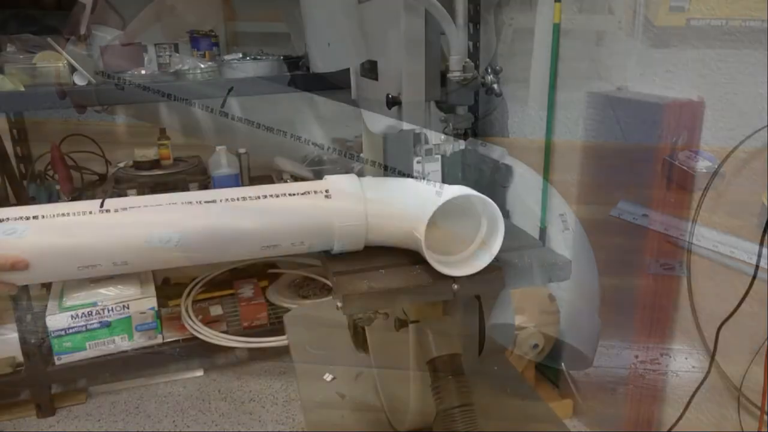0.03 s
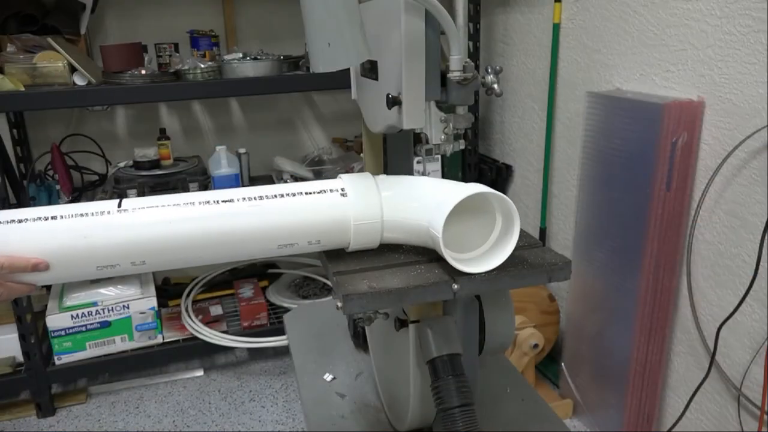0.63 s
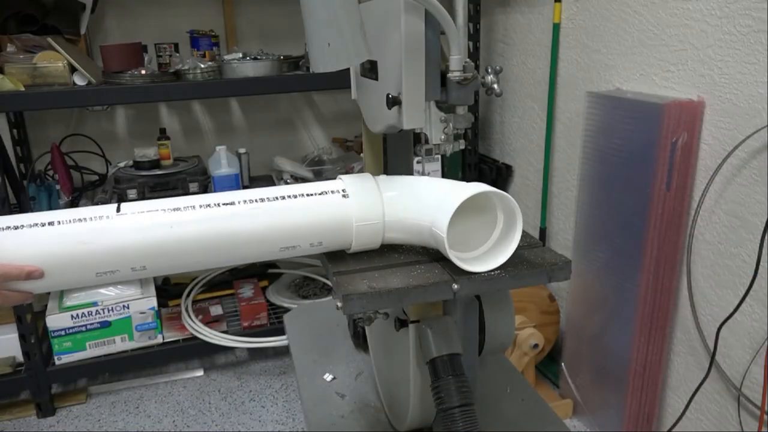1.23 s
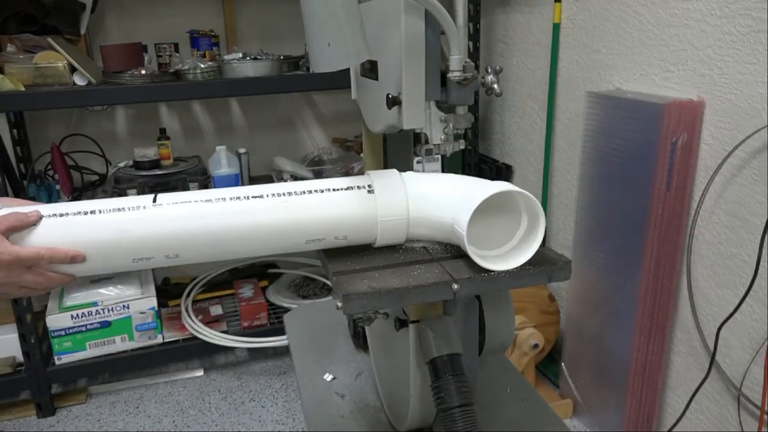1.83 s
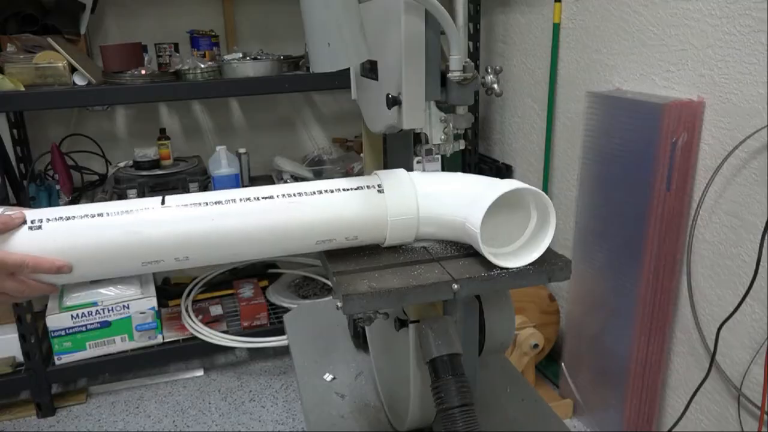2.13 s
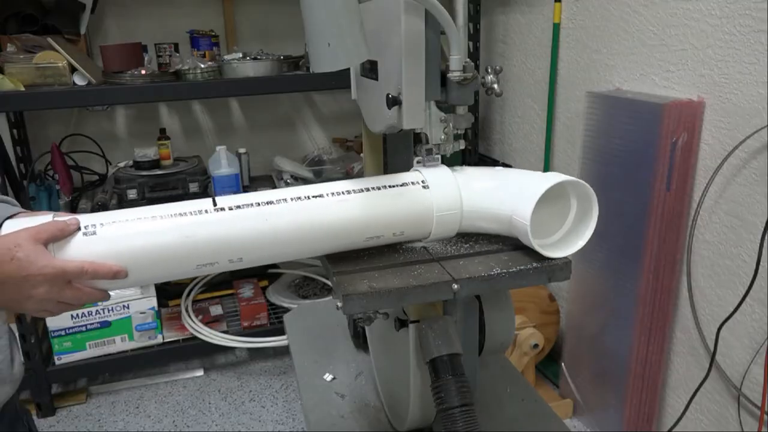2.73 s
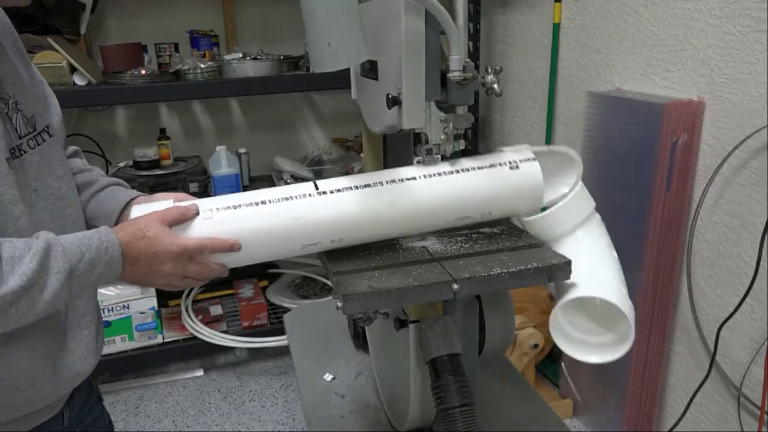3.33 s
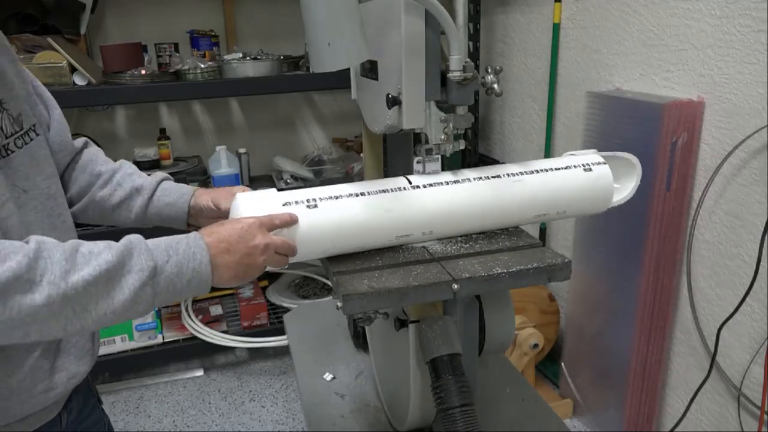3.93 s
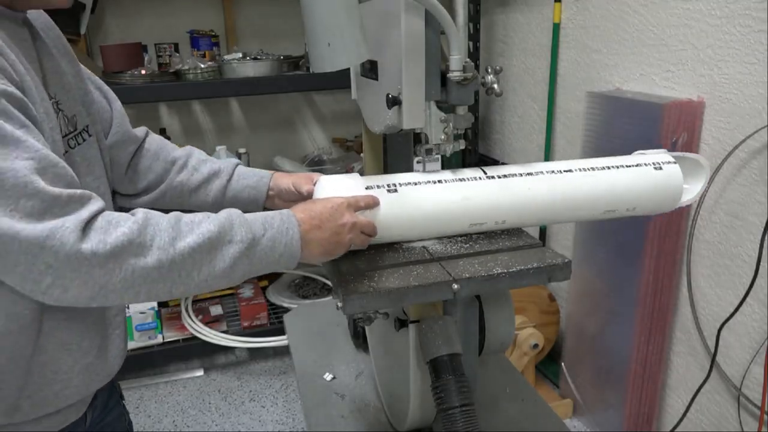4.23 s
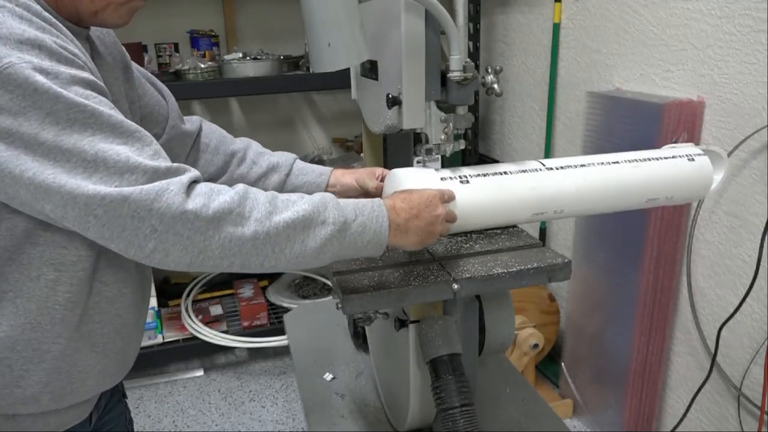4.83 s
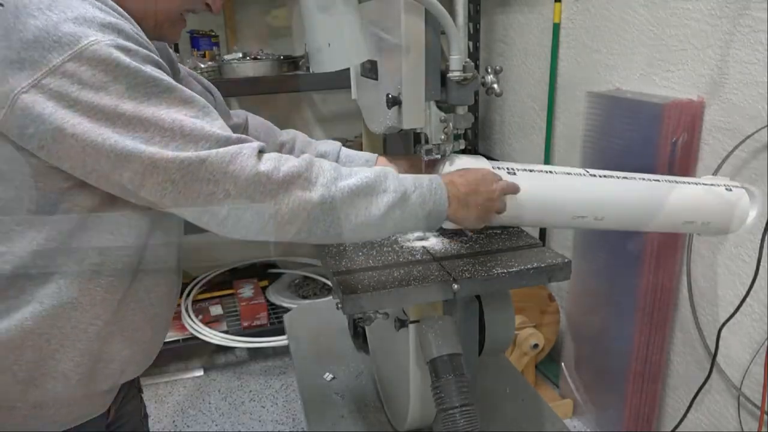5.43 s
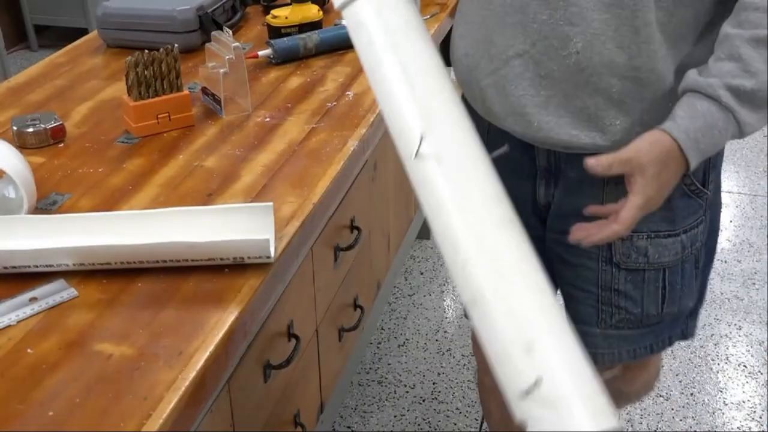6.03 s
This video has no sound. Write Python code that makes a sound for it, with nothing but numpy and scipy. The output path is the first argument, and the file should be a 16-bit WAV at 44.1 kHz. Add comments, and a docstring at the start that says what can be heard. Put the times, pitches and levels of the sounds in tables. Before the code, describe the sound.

A bandsaw whines steadily while its teeth hiss and rasp through hollow plastic pipe, heard up close in a small workshop. Thin, chattering squeals come and go. A pipe elbow breaks loose with a quick clatter and the cutting carries on, ending with dull knocks and a sudden stop. In the quiet room, the pipe rubs softly through a hand and is lightly bumped.

```python
"""Bandsaw slitting a plastic pipe.

Close by in a small workshop, over a steady whine, the teeth tear off a hiss of chips and the pipe wall
rasps and booms. The blade squeals where the slot pinches it, an elbow breaks loose and clacks, and the
pipe jolts as the last of the wall gives way. The saw stops at once; the quiet background comes in with
a faint tick, then the pipe slides through a hand and is lightly bumped."""
import sys
import numpy as np
from scipy import signal
from scipy.fft import rfft, irfft
from scipy.io import wavfile

SR = 44100
rng = np.random.default_rng(int(sys.argv[2]) if len(sys.argv) > 2 else 0)


def dump_mix(stems):
    """Bounce the given channels to the path in sys.argv[1] as a 16-bit WAV at rate SR."""
    frames = np.atleast_2d(stems).T  # one column per channel
    limited = np.clip(frames, -1, 1)  # hard clip at full scale
    pcm = np.round(limited * 32767).astype(np.int16)
    wavfile.write(sys.argv[1], SR, pcm)


N = 268304
TIME_S = np.arange(N) / SR
BIN_HZ = np.maximum(np.arange(N // 2 + 1) * SR / N, 1)


def from_db(db):
    """Decibels to gain."""
    return 10 ** (np.asarray(db) / 20)


def unit_rms(x):
    """Scale to rms 1."""
    return x / np.sqrt(np.mean(np.abs(x) ** 2) + 1e-20)


def curves(rows):
    """Each column after time, interpolated per sample."""
    times_s, *columns = np.transpose(rows)
    return [np.interp(TIME_S, times_s, column) for column in columns]


def bin_gains(spectrum):
    """Gain per FFT bin from (frequency [Hz], level [dB]) points."""
    hz, db = np.transpose(spectrum)
    return from_db(np.interp(np.log(BIN_HZ), np.log(hz), db))


def noise(spectrum, modulation=1):
    """Modulated noise shaped to a spectrum, rolled off past its ends; rms 1."""
    low_hz, high_hz = spectrum[0][0], spectrum[-1][0]
    skirts = np.minimum(BIN_HZ / low_hz, 1) ** 2 * np.minimum(high_hz / BIN_HZ, 1) ** 2
    white = rng.standard_normal(N) * modulation
    return unit_rms(irfft(rfft(white) * bin_gains(spectrum) * skirts, N))


def wander(width_hz, size=N):
    """Random complex amplitude, faster with wider bandwidth; rms 1."""
    lowpass = signal.butter(2, np.clip(width_hz / 2, 2, 4000), fs=SR, output="sos")
    run_in = SR // 8
    real, imag = signal.sosfilt(lowpass, rng.standard_normal((2, size + run_in)))[:, run_in:]
    return unit_rms(real + 1j * imag)


def resonances(modes):
    """Randomly driven modes of (frequency [Hz], width [Hz], level [dB])."""
    return np.sqrt(2) * sum(from_db(db) * (wander(width_hz) * np.exp(2j * np.pi * hz * TIME_S)).real
                            for hz, width_hz, db in modes)


# Machine whine: (time [s], relative level [dB])
WHINE_LEVEL = [(0.02, -30.5), (0.1, -27.5), (0.29, -24), (0.5, -36), (1.07, -27.5), (1.1, -31.5),
               (1.18, -27), (1.22, -32.5), (1.36, -29), (1.4, -33), (1.44, -29), (1.73, -32), (1.79, -26.5),
               (1.91, -28.5), (2.1, -26.5), (2.13, -29.5), (2.7, -32), (2.74, -29.5), (2.85, -31.5),
               (2.88, -27), (2.95, -30), (3.32, -31), (3.54, -26.5), (3.79, -33), (5.19, -29), (5.4, -34),
               (5.61, -28.5), (5.64, -37)]


def whine(hz=956.3, waver=.15, waver_hz=40, fourth_db=-20, gain_db=-.58, left_over_right_db=4.5):
    """The running machine gives a nearly pure tone with a faint fourth harmonic."""
    level_db, = curves(WHINE_LEVEL)
    phase = 2 * np.pi * hz * TIME_S
    fundamental = (np.exp(1j * phase) * (1 + waver * wander(waver_hz))).real
    tone = fundamental + from_db(fourth_db) * np.sin(4 * phase)
    pan = from_db(left_over_right_db * np.array([[.5], [-.5]]))
    return np.sqrt(2) * from_db(level_db + gain_db) * tone * pan


# Cutting effort: (time [s], relative hiss [dB], relative rasp [dB])
CUT_LEVELS = [
    (0.02, -26.5, -31), (0.22, -21.5, -26.5), (0.47, -24, -28.5), (0.52, -23.5, -25), (0.62, -23.5, -27),
    (0.74, -22.5, -28), (0.78, -22.5, -26), (1.88, -22, -27.5), (2.05, -21, -26), (2.31, -22, -27.5),
    (3.38, -22, -27), (3.6, -21.5, -27), (3.91, -24.5, -27.5), (4.6, -22.5, -25.5), (4.62, -23, -28),
    (5.27, -22, -27.5), (5.34, -23, -26.5), (5.38, -30, -31), (5.41, -27, -28), (5.46, -27, -34),
    (5.56, -25.5, -29.5), (5.64, -25, -31.5)]
# Chip hiss and wall rasp: (frequency [Hz], relative density [dB])
HISS_SPECTRUM = [(3500, -22), (5400, -3.8), (6200, .5), (7000, -1.2), (8200, -.9), (9200, 2.4), (10200, .4),
                 (11300, -1.2), (13200, .3), (14200, .8), (15100, -.3), (16000, -2)]
RASP_SPECTRUM = [(550, -20), (950, -5), (1400, -2.3), (2000, -2), (3100, .2), (4300, -1.3), (5200, -3.6),
                 (7000, -18)]


def tooth_bites(bite_hz=990, bite_db=1.2, hiss_gain_db=1.85, rasp_gain_db=.5):
    """The same uneven bites throw off hissing chips and rasp the pipe wall."""
    hiss_db, rasp_db = curves(CUT_LEVELS)
    bite = from_db(bite_db * wander(bite_hz).real)
    hiss = from_db(hiss_db + hiss_gain_db) * noise(HISS_SPECTRUM, bite)
    rasp = from_db(rasp_db + rasp_gain_db) * noise(RASP_SPECTRUM, bite)
    return hiss + rasp


# Hollow boom: (time [s], relative level [dB])
PIPE_BOOM_LEVEL = [(0.02, -43.5), (0.18, -38.5), (0.46, -39), (0.61, -34.5), (1.1, -37.5), (2.12, -36),
                   (2.25, -34), (2.6, -37), (2.86, -33.5), (3.02, -37), (3.17, -33), (3.28, -35.5),
                   (3.38, -36), (3.52, -39.5), (3.68, -33.5), (3.95, -36), (4.29, -32.5), (4.42, -35.5),
                   (4.56, -33.5), (4.68, -36.5), (5.05, -36.5), (5.2, -36), (5.3, -32), (5.38, -31.5),
                   (5.45, -43.5), (5.64, -41.5)]
# Boom and table rumble: (frequency [Hz], relative density [dB])
BOOM_SPECTRUM = [(70, -18), (130, -1.5), (200, 1.5), (400, -1.2), (620, 0), (780, -.7), (1050, -6),
                 (1600, -22)]
RUMBLE_SPECTRUM = [(12, -4), (28, 1.5), (50, 0), (90, -.3), (140, -5), (240, -22)]


def pipe_boom(flutter_hz=65, flutter_db=2, boom_gain_db=1, rumble_db=-44, rumble_follow=.69):
    """The teeth shake the wall and the air inside; the pipe rumbles on the table."""
    boom_db, = curves(PIPE_BOOM_LEVEL)
    flutter = from_db(flutter_db * wander(flutter_hz).real)
    boom = from_db(boom_db + boom_gain_db) * noise(BOOM_SPECTRUM, flutter)
    shake = from_db(rumble_db + rumble_follow * (boom_db - boom_db.mean()))
    return boom + shake * noise(RUMBLE_SPECTRUM)


# Blade and frame modes; near-harmonic blade song: (frequency [Hz], width [Hz], relative level [dB])
BLADE_MODES = [(848, 10, -28.5), (2628, 12, -26), (2870, 20, -27), (2936, 20, -26), (3830, 80, -25),
               (7562, 12, -25), (9408, 40, -21), (14050, 120, -22)]
SONG_PARTIALS = [(6240, 330, -6), (12650, 400, -9), (15600, 210, 2)]


def blade_ring(ring_gain_db=1, song_gain_db=-17):
    """Teeth ring blade and frame, and stick-slip keeps the blade singing; both follow the hiss."""
    hiss_db, _ = curves(CUT_LEVELS)
    ringing = from_db(hiss_db + ring_gain_db) * resonances(BLADE_MODES)
    song = from_db(hiss_db + song_gain_db) * resonances(SONG_PARTIALS)
    return ringing + song


# Blade pinches: (start [s], end [s], settled pitch [Hz], initial offset [Hz], width [Hz], level [dB])
PINCHES = [ (.21, 0.268, 2180, 0, 50, -30), (.26, 0.312, 3950, -2, 130, -31),
           (0.302, 0.425, 2196, 4, 50, -35.5), (0.354, .53, 11330, -750, 300, -26),
           (0.374, .565, 7130, -2.5, 450, -29), (0.511, .69, 6780, -1.5, 450, -28),
           (.66, .76, 7200, -3, 400, -32), (0.697, 0.782, 9540, -250, 250, -26.5),
           (.805, .875, 6550, 5, 400, -29), (0.844, 1.682, 9540, -1, 250, -38.5),
           (0.907, 1.003, 6270, 302.5, 850, -26), (1.0, 1.06, 6100, -1, 1000, -27),
           (1.06, 1.172, 6150, -0.5, 750, -27), (1.17, 1.315, 6550, -350, 900, -27.5),
           (1.295, 1.366, 6200, 0.5, 900, -26.5), (1.354, 1.442, 6250, 0, 950, -24.5),
           (1.433, 1.49, 9170, -7, 600, -24), (1.425, 1.565, 6250, 201, 850, -27.5),
           (1.55, 1.788, 6440, 1, 800, -28), (1.72, 2.348, 13300, 4, 1400, -33),
           (2.552, 2.702, 7440, -1, 220, -31), (2.57, 2.708, 9200, 5, 150, -32),
           (2.686, 2.96, 12650, 447, 500, -32), (2.90, 3.06, 15600, 0, 160, -27),
           (3.0, 3.21, 12800, -150, 221, -30.5), (3.002, 3.40, 6160, 0.5, 350, -34),
           (3.142, 3.378, 3100, 250, 250, -34), (3.23, 3.39, 12600, 146, 220, -31),
           (3.545, 3.72, 12550, 549, 220, -30.5), (3.53, 4.68, 15630, -0.5, 130, -27),
           (3.695, 4.597, 6280, 1, 251, -33.5), (3.72, 4.238, 12500, 251.5, 180, -28.5),
           (4.037, 4.235, 9425, -3, 80, -31), (4.22, 4.642, 12500, 301, 350, -32),
           (4.621, 4.78, 7600, -3, 150, -32.5), (4.904, 5.103, 7400, 397, 200, -28.5),
           (5.333, 5.402, 8800, -1300, 1100, -26.5), (5.354, 5.446, 9300, -4, 800, -24),
           (5.388, 5.44, 3600, 0, 650, -27)]


def blade_squeals(chatter_hz=80, chatter_db=1, surge_hz=30, surge_db=2.5,
                  wobble=.005, wobble_hz=39, settle_s=.098):
    """The pinched blade sticks and slips in chattering squeals that wobble and settle in pitch."""
    flicker_db = chatter_db * wander(chatter_hz).real + surge_db * wander(surge_hz).real
    bend = 1 + wobble * wander(wobble_hz).real
    squeals = np.zeros(N)
    for start_s, end_s, hz, offset_hz, width_hz, db in PINCHES:
        span = np.arange(int(start_s * SR), int(end_s * SR))
        t = TIME_S[span]
        pitch_hz = hz * bend[span] + offset_hz * np.exp((start_s - t) / settle_s)
        phase = 2 * np.pi * np.cumsum(pitch_hz) / SR
        slip = np.sqrt(2) * (wander(width_hz, len(span)) * np.exp(1j * phase)).real
        edge_s = .0087 + .11 * (end_s - start_s)
        grip = np.clip(np.minimum(t - start_s, end_s - t) / edge_s, 0, 1)
        squeals[span] += from_db(db) * grip * slip
    return squeals * unit_rms(from_db(flicker_db))


def decay(start_s, fade_s):
    """Exponential fall from 1 after start_s, silent before."""
    return (TIME_S > start_s) * np.exp(-np.clip((TIME_S - start_s) / fade_s, 0, 20))


# Elbow contacts: (time [s], level [dB], decay constant [s])
ELBOW_CONTACTS = [(3.3945, -21, .003), (3.418, -15, .005), (3.4225, -16.5, .005), (3.429, -21, .005),
                  (3.4365, -19.5, .007), (3.444, -24, .009), (3.468, -26, .004), (3.4735, -17.5, .005),
                  (3.481, -21, .007), (3.547, -26, .006), (3.554, -25, .007)]
# Elbow modes: (frequency [Hz], width [Hz], relative level [dB])
ELBOW_MODES = [(1900, 380, -3), (3350, 700, -1.5), (4400, 450, 0), (5290, 300, -10), (6100, 300, -7.5)]


def elbow_clacks(uneven_db=2):
    """The loose elbow strikes blade and pipe; each contact favours different modes."""
    contacts = np.array([from_db(db) * decay(start_s, fade_s) for start_s, db, fade_s in ELBOW_CONTACTS])
    scatter_db = uneven_db * rng.standard_normal((len(ELBOW_CONTACTS), len(ELBOW_MODES)))
    weights = from_db(np.array(ELBOW_MODES)[:, 2] + scatter_db)
    weights /= np.linalg.norm(weights, axis=1, keepdims=True)
    return sum((weight @ contacts) * resonances([(hz, width_hz, 0)])
               for weight, (hz, width_hz, _) in zip(weights.T, ELBOW_MODES))


# Pipe jolts: (time [s], relative level [dB])
JOLT_HITS = [(5.286, -23), (5.318, -28), (5.343, -29), (5.37, -28.5)]
# Thud with a hollow knock: (frequency [Hz], relative density [dB])
JOLT_SPECTRUM = [(15, -1), (36, 5), (60, -3), (110, -8), (200, -5), (400, -12), (650, -9), (1150, -16),
                 (1490, -6), (1800, -24)]


def pipe_jolts(rise_s=.008, fade_s=.018):
    """The pipe jolts as the last of the wall gives way."""
    envelope = sum(from_db(db) * np.clip((TIME_S - start_s) / rise_s, 0, 1) * decay(start_s, fade_s)
                   for start_s, db in JOLT_HITS)
    return envelope * noise(JOLT_SPECTRUM)


# Quiet room: (frequency [Hz], relative density [dB])
ROOM_SPECTRUM = [(20, -7.5), (60, -6), (100, 10.5), (160, -10), (300, -3), (900, -12), (2000, -15),
                 (15000, -23.5)]


def room_hush(level_db=-63):
    """The workshop's faint, steady background."""
    return from_db(level_db) * noise(ROOM_SPECTRUM)


def ring(drive, modes):
    """A drive excites one damped sine per mode."""
    ringing = np.zeros(N)
    for hz, db, t60_s in modes:
        radius, angle = from_db(-60 / (t60_s * SR)), 2 * np.pi * hz / SR
        feedback = [1, -2 * radius * np.cos(angle), radius ** 2]
        ringing += from_db(db) * signal.lfilter([0, np.sin(angle)], feedback, drive + 1e-18)
    return ringing


# Hollow pipe modes: (frequency [Hz], relative level [dB], T60 [s])
PIPE_MODES = [(261, -9.5, 0.026), (635, -10.5, 0.017), (1090, -8, 0.019), (1445, -9, .05), (1680, -9, .025),
              (2630, -13, .012)]
# A faint tick, then light bumps of the pipe from 5.917 s: (time [s], impulse level [dB])
TICK_AND_BUMPS = [(5.684, -54), (5.917, -35), (5.9255, -37.5), (5.94, -44), (5.952, -45), (6.008, -47)]


def tick_and_bumps():
    """A faint tick as the quiet background comes in; then light bumps ring the pipe's modes."""
    impulses = np.zeros(N)
    for start_s, db in TICK_AND_BUMPS:
        impulses[int(start_s * SR)] = from_db(db)
    return ring(impulses, PIPE_MODES)


# Skin on plastic: (frequency [Hz], relative density [dB])
SLIDE_SPECTRUM = [(88, -24), (150, -4), (268, -1.5), (332, -9), (373, -1), (481, -14), (631, 0), (1150, -2),
                  (1450, 4), (1870, -4), (3410, -11), (5130, -8), (6350, -14.5), (13000, -28), (15500, -38)]


def hand_slide(peak_s=5.96, gain_db=-51.5, rise_db_per_s=76, fall_db_per_s=28, hollow_db=-4.5):
    """The pipe speeds up through a hand, then slows; friction rings its upper modes."""
    past_peak_s = TIME_S - peak_s
    swell_db = np.minimum(rise_db_per_s * past_peak_s, -fall_db_per_s * past_peak_s)
    hollow = unit_rms(ring(rng.standard_normal(N), PIPE_MODES[1:]))
    rub = noise(SLIDE_SPECTRUM) + from_db(hollow_db) * hollow
    return from_db(gain_db + swell_db) * rub


def workshop_echoes(source, side_spectrum, wet_db, t60_s):
    """Scattered echoes off table and walls colour the sound and differ left and right."""
    t = TIME_S[:SR // 3]
    echoes = rng.standard_normal((2, len(t))) * from_db(-60 * t / t60_s) * (t > .002)
    echoes /= np.linalg.norm(echoes, axis=1, keepdims=True)
    shared, apart = signal.fftconvolve(source[None], echoes)[:, :N]
    side = irfft(rfft(apart) * bin_gains(side_spectrum), N)
    mid = (source + from_db(wet_db) * shared) / np.hypot(1, from_db(wet_db))
    return mid + side * np.array([[1], [-1]])


# Stereo width at saw and bench: (frequency [Hz], side re mid [dB])
SAW_SIDE = [(60, -14), (500, -14.5), (1300, -19), (2800, -16), (5000, -19.5), (9000, -15.5), (14000, -14)]
BENCH_SIDE = [(60, -13), (250, -9), (700, -13.5), (1300, -26), (4400, -19.5), (9000, -4)]


def scene(saw_on_s=.0155, saw_off_s=5.6495, quiet_on_s=5.682):
    """The saw, an abrupt stop, a moment of near silence, then quiet handling of the pipe."""
    cut = tooth_bites() + pipe_boom() + blade_ring() + blade_squeals() + elbow_clacks() + pipe_jolts()
    pan_right = from_db([[-.2], [.2]])
    saw = whine() + workshop_echoes(cut, SAW_SIDE, wet_db=-12, t60_s=.2) * pan_right
    saw_gate = (TIME_S > saw_on_s) * np.interp(TIME_S - saw_off_s, [0, .001, .01], [1, .08, 0])
    quiet = room_hush() + tick_and_bumps() + hand_slide()
    bench = workshop_echoes(quiet, BENCH_SIDE, wet_db=-10.5, t60_s=.25)
    bench_gate = np.where(TIME_S > quiet_on_s, 1, .12)
    return saw * saw_gate + bench * bench_gate


def record(dry, cutoff_hz=15780):
    """Steep low-pass on the top treble."""
    return signal.sosfilt(signal.ellip(14, .1, 85, cutoff_hz, fs=SR, output="sos"), dry)


dry = scene()
out = record(dry)
dump_mix(out)
```